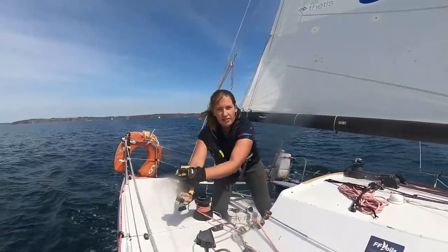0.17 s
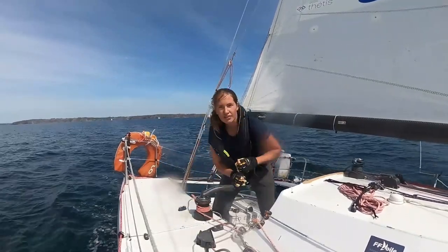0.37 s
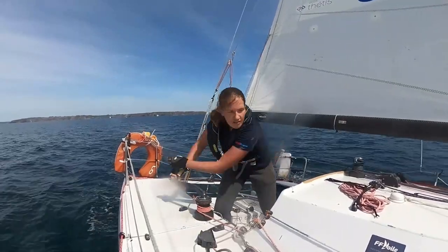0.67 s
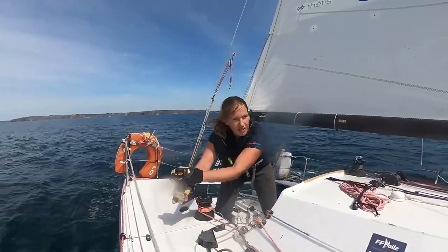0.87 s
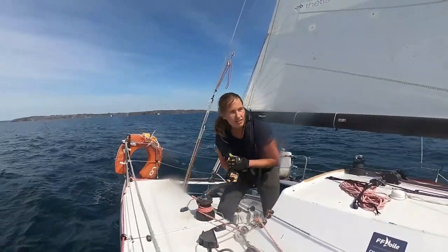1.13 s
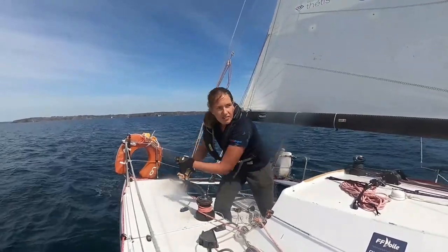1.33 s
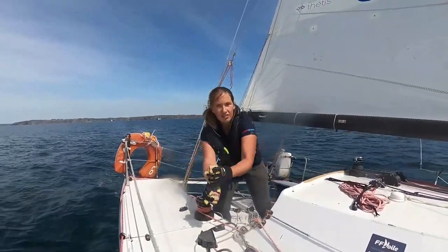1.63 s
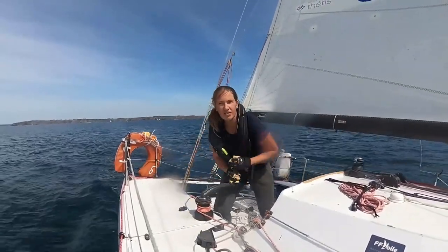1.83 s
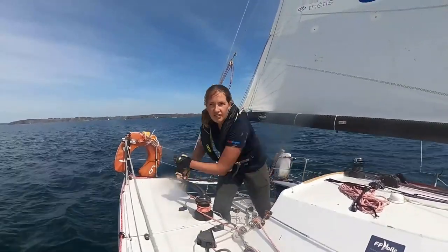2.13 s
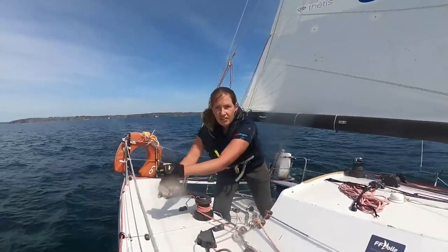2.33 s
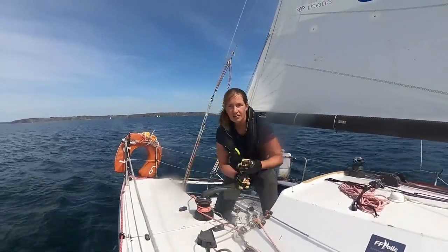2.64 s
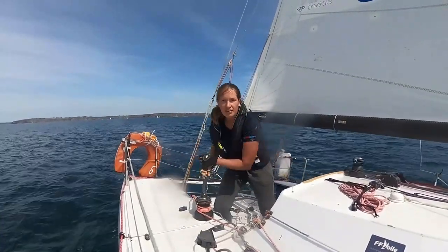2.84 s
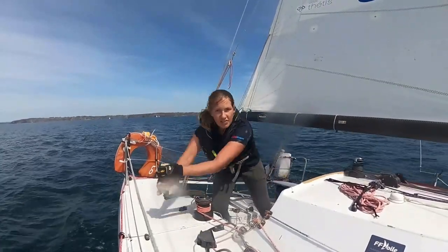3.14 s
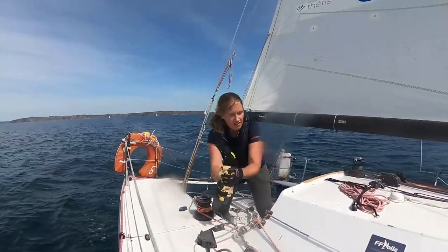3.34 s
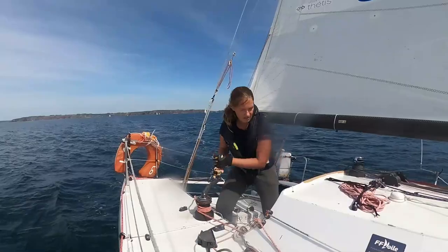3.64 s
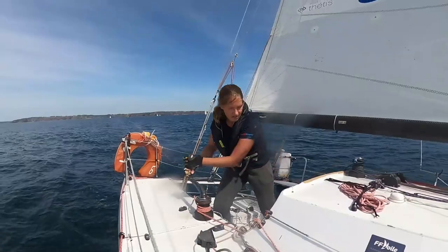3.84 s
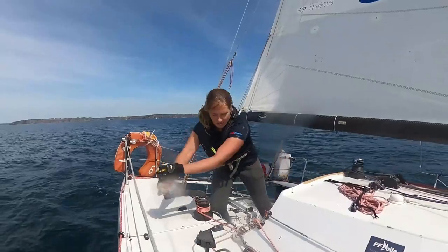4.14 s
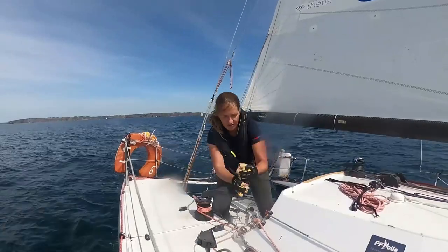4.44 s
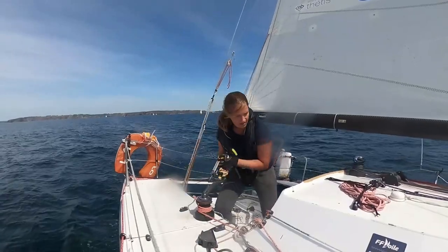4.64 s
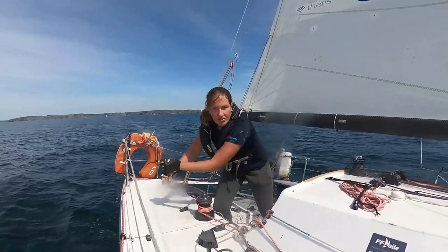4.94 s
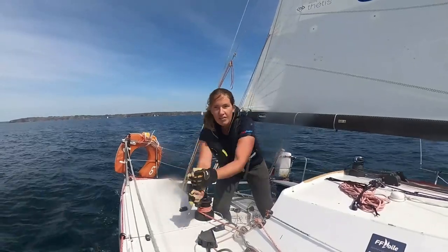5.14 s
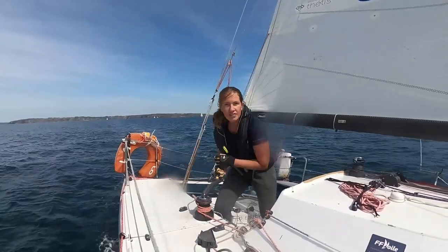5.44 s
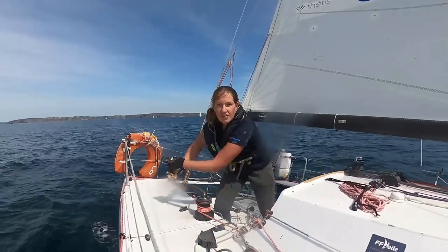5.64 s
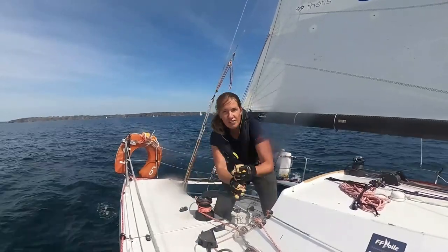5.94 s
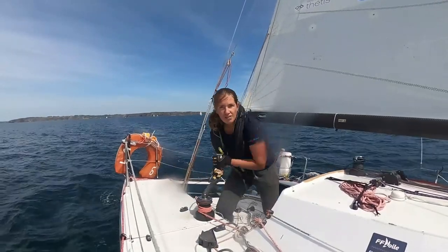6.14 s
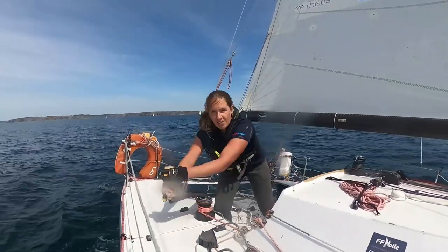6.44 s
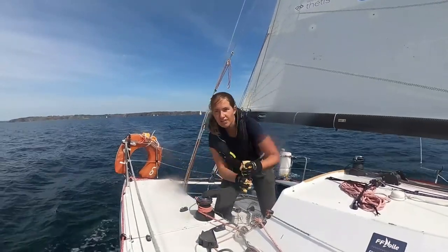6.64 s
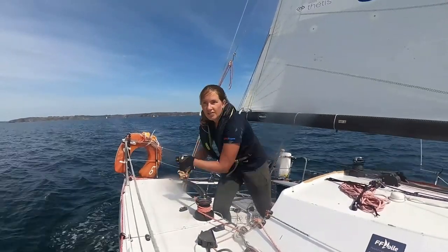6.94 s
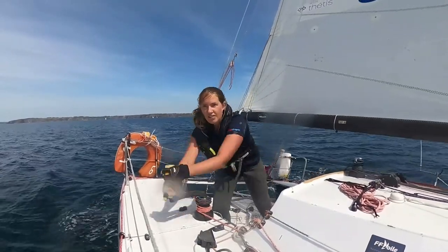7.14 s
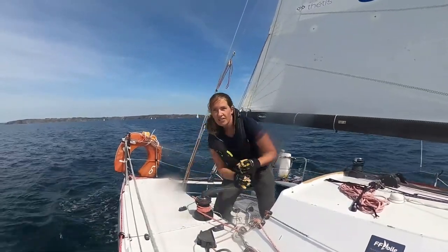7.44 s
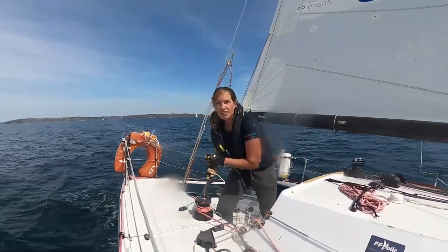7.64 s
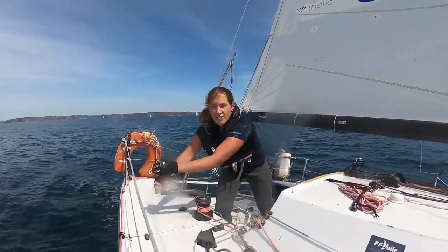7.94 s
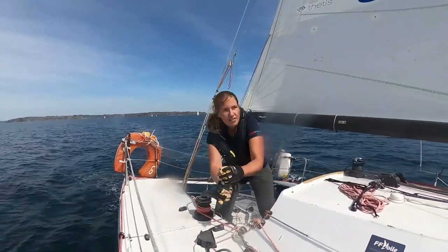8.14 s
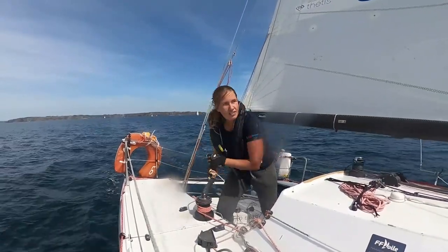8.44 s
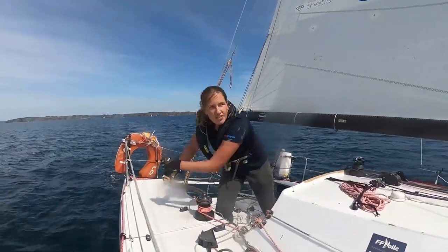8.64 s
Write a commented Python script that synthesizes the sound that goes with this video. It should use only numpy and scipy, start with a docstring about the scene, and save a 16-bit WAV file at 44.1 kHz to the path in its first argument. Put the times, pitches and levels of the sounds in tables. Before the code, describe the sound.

Loaded metal winch clunks ring through a boat deck amid small ratchet ticks, dull knocks, rumbling gusts and sea wash.

```python
"""A sheet winch is cranked by hand on a sailing boat under way, a few steps from a camera fixed to the deck.
The loaded winch lets go in hard clacks: a metal crack, bending waves in the deck that fall in pitch, a hull thump
and a scattered ring. Pawls tick in between, built from short grainy bursts; dull knocks stir the same deck.
Wind buffets the microphone and the sea sloshes and hisses along the hull: coloured noise whose level moves."""
import sys
import numpy as np
from scipy import signal
from scipy.fft import rfft, irfft, next_fast_len
from scipy.io import wavfile
from scipy.ndimage import uniform_filter1d, map_coordinates

SR = 44100
rng = np.random.default_rng(int(sys.argv[2]) if len(sys.argv) > 2 else 0)


def master(y):
    """Save y as 16-bit WAV."""
    cut = np.clip(np.atleast_2d(y).T, -1, 1)
    pcm = np.round(cut * 32767)  # scale
    wavfile.write(sys.argv[1], SR, pcm.astype(np.int16))


N = 388080  # length of the scene [samples]


def amp(db):
    """Turn decibels into a gain."""
    return 10 ** (np.asarray(db) / 20)


def unit(x):
    """Scale x to rms 1."""
    return x / np.sqrt(np.mean(x ** 2) + 1e-20)


def unit_blow(x):
    """Scale a short sound to the energy of 40 ms at rms 1."""
    return x / np.sqrt(np.sum(x ** 2) / (.04 * SR) + 1e-20)


def along(points, hz):
    """Read (frequency [Hz], value) points at any frequency, on a log frequency axis."""
    f, v = np.transpose(points)
    return np.interp(np.log(hz + 1), np.log(f + 1), v)


def curves(rows):
    """Draw straight lines between timed rows: one value per sample for each column after the time."""
    s, *cols = np.transpose(rows)
    return [np.interp(np.arange(N) / SR, s, c) for c in cols]


def wobble(rate):
    """A smooth random curve with rate knots a second."""
    knots = rng.standard_normal(int(N * rate / SR) + 4)
    return map_coordinates(knots, [np.arange(N) * rate / SR])


def coloured(x, spectrum):
    """Filter x to the given (frequency [Hz], gain [dB]) points, with no sound ahead of its cause."""
    size = 4096
    cepstrum = irfft(np.log(amp(along(spectrum, np.fft.rfftfreq(size, 1 / SR)))))
    # folding the cepstrum forward in time makes the filter minimum phase
    cepstrum[1:size // 2] *= 2
    cepstrum[size // 2 + 1:] = 0
    impulse_response = irfft(np.exp(rfft(cepstrum)))
    return signal.fftconvolve(x, impulse_response)[:len(x)]


def rush(spectrum, patchy_db):
    """Steady coloured noise of rms 1, uneven in random patches of time and frequency."""
    z = signal.stft(rng.standard_normal(N), nperseg=512)[2]
    field = uniform_filter1d(rng.standard_normal(z.shape), size=7, axis=0)
    field = uniform_filter1d(field, size=8, axis=1)
    noise = signal.istft(z * amp(patchy_db * unit(field)), nperseg=512)[1][:N]
    gain = amp(along(spectrum, np.fft.rfftfreq(N, 1 / SR)))
    return unit(irfft(rfft(noise) * gain, N))


def burst(spectrum, t60, rise_s, grain_db):
    """A short, grainy cluster of contacts: noise that rises quickly and falls 60 dB in t60 seconds."""
    t = np.arange(SR // 4) / SR
    grains = np.interp(t, np.linspace(0, t[-1], 150), rng.standard_normal(150))
    envelope = amp(grain_db * grains - 60 * t / t60) * (1 - np.exp(-t / rise_s))
    return unit_blow(coloured(rng.standard_normal(len(t)) * envelope, spectrum))


def snap(spectrum):
    """One hard contact: a single coloured impulse."""
    return unit_blow(coloured(signal.unit_impulse(SR // 50), spectrum))


def resonances(modes, hz, vary_db):
    """Frequency response of a set of resonances, each struck a little differently every time."""
    centre, width, db = np.transpose(modes)[:, :, None]
    sign = (-1) ** np.arange(len(modes))[:, None]
    gain = sign * amp(db + vary_db * rng.standard_normal(db.shape))
    damping = 1j * hz * width
    return np.sum(gain * damping / (centre ** 2 - hz ** 2 + damping), axis=0)


def ring_out(response):
    """The sound of a frequency response, faded to silence by a quarter of a second."""
    sound = irfft(response)[:SR // 4]
    return sound * np.minimum(np.linspace(2, 0, len(sound)), 1)


def add(track, s, sound, lead=0):
    """Mix a sound into the track so that its sample number lead falls at time s."""
    start = round(s * SR) - lead
    sound = sound[max(-start, 0):]
    room = track[max(start, 0):][:len(sound)]
    room += sound[:len(room)]


FAINT_SPREAD_DB = 3  # faint ticks and knocks lie within this much of their middle level


def strays(rate, db):
    """(time [s], level [dB]) of faint events, one at a random moment in each 1/rate seconds."""
    chance = rng.random((int(rate * N / SR), 2))
    return [((k + when) / rate, db + FAINT_SPREAD_DB * (2 * size - 1))
            for k, (when, size) in enumerate(chance)]


# water under the hull: (time [s], slosh level before a small lift [dB])
SLOSH_LEVEL = [(0.0, -39), (0.27, -39), (0.46, -45), (1.62, -44), (1.99, -47.5), (3.09, -41.5), (3.8, -47),
               (4.34, -41.5), (5.66, -43), (5.91, -39.5), (6.2, -47), (6.64, -40.5), (6.86, -47.5),
               (8.26, -43), (8.65, -46), (8.8, -38)]
# bubbles in the wake: (time [s], hiss level before a small lift [dB])
HISS_LEVEL = [(0.0, -64.5), (0.17, -56.5), (1.69, -61.5), (1.86, -57), (2.62, -56), (2.79, -63.5),
              (4.0, -56.5), (4.48, -62.5), (4.63, -52.5), (4.78, -53), (6.3, -61.5), (6.84, -63.5),
              (7.21, -60.5), (7.33, -65), (7.89, -61.5), (8.13, -56), (8.63, -62), (8.8, -60.5)]
# a small wave breaks alongside; its foam sinks, swells once more faintly, then dies away:
# (time [s], foam level [dB])
FOAM_LEVEL = [(4.5, -91), (4.64, -52), (4.75, -45.5), (4.87, -53), (5.1, -60), (5.55, -55.5), (5.9, -85)]
# colours of the three water sounds: (frequency [Hz], relative gain [dB])
SLOSH_COLOUR = [(100, -8), (220, 0), (350, 1.5), (600, -4.5), (1000, -10), (1600, -13), (2300, -31),
                (4000, -35), (14000, -100)]
HISS_COLOUR = [(800, -9.5), (2000, 2), (3500, -2.5), (5000, -7), (7000, -14), (8500, -19), (10000, -29.5),
               (13000, -38.5), (16000, -60.5)]
FOAM_COLOUR = [(300, -9.5), (1200, 4.5), (2500, 11), (4500, 4.5), (7000, -5), (9000, -16), (11000, -20),
               (15000, -44)]


def sea():
    """Water sloshes under the hull while bursting bubbles hiss; a breaking wavelet adds foam."""
    (slosh_db,), (hiss_db,), (foam_db,) = curves(SLOSH_LEVEL), curves(HISS_LEVEL), curves(FOAM_LEVEL)
    slosh = amp(slosh_db + 0.2 + 1.3 * wobble(55)) * rush(SLOSH_COLOUR, patchy_db=2.5)
    # about 1500 single bubbles a second over a steady rush
    bubbles = (rng.random(N) < 1500 / SR) * rng.standard_normal(N)
    fizz = rush(HISS_COLOUR, patchy_db=2.0) + amp(-5.5) * unit(coloured(bubbles, HISS_COLOUR))
    hiss = amp(hiss_db + 1.0 + 1.5 * wobble(45)) * fizz
    foam = amp(foam_db + 1.3 * wobble(190)) * rush(FOAM_COLOUR, patchy_db=.6)
    return slosh + hiss + foam


# wind on the microphone between gusts: (time [s], strength [dB])
BREEZE = [(0.0, -22), (0.27, -23.5), (0.51, -28.5), (1.47, -24.5), (1.89, -33), (3.06, -29.5), (3.21, -26),
          (3.82, -30), (4.66, -26.5), (4.78, -29), (5.93, -24), (6.12, -29.5), (7.43, -27.5), (7.62, -32),
          (7.87, -31.5), (8.13, -25), (8.53, -27), (8.8, -26.5)]
# single gusts that hit the microphone: (time [s], buffet level [dB], flutter level [dB])
GUST_HITS = [(1.02, -30, -22), (1.31, -17.5, -27), (1.47, -19, -23.5), (1.68, -20.5, -25), (3.4, -27, -25),
             (4.28, -26, -25), (4.66, -22, -22.5), (5.8, -18.5, -23), (6.79, -19, -18.5), (7.17, -22, -21),
             (7.39, -22, -28), (8.21, -21, -24), (8.79, -18.5, -21.5)]
# colours of the big and the small eddies: (frequency [Hz], relative gain [dB])
BUFFET_COLOUR = [(8, -7), (25, 0), (45, -4.5), (70, -2.5), (100, -14.5), (200, -36.5), (500, -91.5),
                 (2000, -120)]
FLUTTER_COLOUR = [(40, -17.5), (80, -1), (120, 1.5), (160, -6.5), (220, -11), (320, -29), (600, -38),
                  (4000, -120)]
BUFFET_DB, FLUTTER_DB = 1, -3.5  # big and small eddies, relative to the breeze's strength
GUST_WIDTH_S = 0.026  # standard deviation of a gust's bell-shaped swell


def wind():
    """Big eddies push on the microphone and smaller ones flutter across it; both follow the breeze and gusts."""
    strength_db, = curves(BREEZE)
    breeze = amp(strength_db)
    t = np.arange(N) / SR
    push, shake = np.zeros(N), np.zeros(N)
    for s, big_db, small_db in GUST_HITS:
        swell = np.exp(-.5 * ((t - s) / GUST_WIDTH_S) ** 2)
        push += amp(big_db) * swell
        shake += amp(small_db) * swell
    # breeze and gust add as powers
    buffet_level = np.hypot(amp(BUFFET_DB + 1.3 * wobble(14)) * breeze, push)
    flutter_level = np.hypot(amp(FLUTTER_DB + 3.44 * wobble(30)) * breeze, shake)
    buffet = buffet_level * rush(BUFFET_COLOUR, patchy_db=0.24)
    flutter = flutter_level * rush(FLUTTER_COLOUR, patchy_db=0.84)
    return buffet + flutter


# resonances of the deck under the winch: (frequency [Hz], width [Hz], typical level [dB])
DECK_MODES = [(312.7, 26, -7.5), (338.6, 13.4, -1), (367.6, 60.0, -10), (463, 13, -4.5), (483.5, 19, -0.5),
              (598, 56, -9), (667.3, 24, -3.5), (719.4, 30.6, -3.5), (801, 64, 0), (808, 31, -3.5),
              (952, 9.0, -14), (1026, 12, -8.0), (1093, 89, -8.5), (1151, 83, -10.5), (1265, 20, -12),
              (1400, 9.5, -21.5), (1541, 127, -18.5), (1736, 126, -12), (1764, 24, -15), (1930, 90, -18.5),
              (2030, 61, -24), (2170, 120, -24)]


def deck_wave(bright_db, travel_s, front_hz, chatter, direct):
    """One blow heard through the deck: bending waves travel as the root of frequency, so the highs come first."""
    hz = np.fft.rfftfreq(SR // 2, 1 / SR)
    # travel_s is the trip at 1 kHz; delays count from the arrival of front_hz
    slowness = np.sqrt(1000 / np.maximum(hz, 1))
    delay = travel_s * np.maximum(slowness - np.sqrt(1000 / front_hz), 0)
    # a smaller share comes straight through, ahead of the bending wave
    paths = direct + np.exp(-2j * np.pi * np.cumsum(delay) * hz[1])
    # the metal chatters as it seats: five weaker contacts follow the first, typically within milliseconds
    later = rng.exponential(0.00402, size=(5, 1))
    strength = chatter * rng.standard_normal(size=(5, 1)) * np.exp(-later / 0.0091)
    contacts = 1 + np.sum(strength * np.exp(-2j * np.pi * hz * later), axis=0)
    hardness = [(900, 0), (1600, bright_db), (2100, bright_db), (3000, -11.0), (6000, -37), (14000, -91.5)]
    ring = ring_out(resonances(DECK_MODES, hz, vary_db=2.0) * paths * contacts)
    return unit_blow(coloured(ring, hardness))


# low resonances of the hull: (frequency [Hz], width [Hz], typical level [dB])
HULL_MODES = [(112.4, 11.0, 0.5), (148, 19, 2), (184.4, 19, -3), (212, 18, -3), (257.6, 29, -8)]


def hull_thump():
    """The hull's low answer to one blow: its resonances ring, with the treble softened."""
    hz = np.fft.rfftfreq(SR // 2, 1 / SR)
    softness = [(300, -18), (1000, -7.0), (3000, -35.0), (10000, -90)]
    return unit_blow(coloured(ring_out(resonances(HULL_MODES, hz, vary_db=1.5)), softness))


# colour of the sound scattered around the boat after a clack: (frequency [Hz], relative gain [dB])
SCATTER_COLOUR = [(90, -9), (200, -4.5), (400, 8.5), (800, 3.5), (1400, -4.5), (1800, -8.5), (2500, -16),
                  (4000, -26), (7000, -38.5), (9500, -52.5), (11500, -47), (13000, -58), (15000, -54.5)]
# how long the scattered sound takes to fall 60 dB: (frequency [Hz], t60 [s])
SCATTER_T60 = [(200, 0.38), (700, 0.21), (1800, 0.18), (5000, 0.16), (12000, .17)]


def scatter(build_s):
    """Diffuse ring of the boat: it builds up briefly, then each frequency dies at its own speed."""
    hz, t, z = signal.stft(rng.standard_normal(SR // 3), SR, nperseg=256)
    decay = amp(-60 * t / along(SCATTER_T60, hz)[:, None])
    tail = signal.istft(z * decay, SR, nperseg=256)[1]
    build_up = 1 - np.exp(-np.arange(len(tail)) / SR / build_s)
    return unit_blow(coloured(tail * build_up, SCATTER_COLOUR))


# clacks of the loaded winch, each level shared by the parts below at their own offsets:
# (time [s], level [dB], extra hull thump [dB], extra brightness [dB])
WINCH_CLACKS = [(0.062, -25, 5.5, -0.5), (0.145, -22.5, 3.5, 0.5), (0.2549, -21, 2, -1.5),
                (0.3686, -22, 5.5, 1.5), (0.7826, -21, -1, 2), (0.9495, -20, -1, -0.5),
                (1.411, -20.5, -6.5, -1.5), (1.6376, -21, 1.5, -0.5), (1.8944, -21.5, 4, 2.5),
                (2.2649, -19.5, -0.5, -0.5), (2.7147, -18.5, 5.5, -1.5), (3.0395, -19.5, 6, -0.5),
                (3.1707, -19.3, -2, -0.5), (4.0593, -20.3, -1.5, 0), (4.1784, -19.2, -5, 0.5),
                (4.478, -19, 4.5, 1), (5.1495, -21.4, 6.5, 1), (5.3292, -20, 5.5, -0.5),
                (5.6989, -20, 5, -0.5), (5.829, -20.3, 3.5, 0), (6.0384, -19.5, 4, -1.5),
                (6.3761, -20, -1, -2.5), (6.5544, -19.5, 0, -1.5), (7.0688, -19.5, -2.5, -0.5),
                (7.1981, -20, -0.5, -0.5), (7.5132, -20.5, 6, 1), (7.957, -19, -1, 0.5),
                (8.3335, -21.7, 7, -2.5), (8.6382, -19.5, 2, 0)]
# the line creeping on the drum just before a clack: (frequency [Hz], relative gain [dB])
CREEP_COLOUR = [(200, -12.5), (600, 6), (1100, 1.5), (1800, -0.5), (2500, -9.5), (4000, -20.5), (7000, -35),
                (10000, -44), (15000, -64)]
# the metal contact itself: (frequency [Hz], relative gain [dB])
CRACK_COLOUR = [(900, -31.5), (2000, 13), (2600, -1), (3600, -0.5), (5000, -15), (7000, -20.5),
                (9500, -42.5), (11500, -50.5), (15000, -65.5)]
# the metal seats equally hard at every clack: the grainy crack, and one hard snap just after it begins
CRACK_DB, SNAP_DB = -42, -51
BOOM_DB, BOOM_T60_S = -6.5, .22  # low boom of the hull, relative to the clack's level


def winch():
    """The load creeps, then lets go: a metal crack, a falling wave in the deck, a hull thump and a diffuse ring."""
    out = np.zeros(N)
    for s, db, thump_db, bright_db in WINCH_CLACKS:
        # a burst played backwards swells up to the release
        creep = burst(CREEP_COLOUR, t60=0.051, rise_s=0.00064, grain_db=2.0)[::-1]
        wave = deck_wave(bright_db, travel_s=.012, front_hz=2100, chatter=.17, direct=0.32)
        # the boom shares the low colour of the wind's flutter
        boom = burst(FLUTTER_COLOUR, t60=BOOM_T60_S, rise_s=0.006, grain_db=1.0)
        crack = burst(CRACK_COLOUR, t60=0.037, rise_s=0.001, grain_db=1.0)
        add(out, s + .001, amp(db - 20) * creep, lead=len(creep))
        add(out, s, amp(db - 0.5) * wave)
        add(out, s, amp(db + thump_db - 6) * hull_thump())
        add(out, s, amp(db + BOOM_DB) * boom)
        add(out, s - .0005, amp(CRACK_DB) * crack)
        add(out, s + 0.00092, amp(SNAP_DB) * snap(CRACK_COLOUR))
        add(out, s, amp(db - 4.0) * scatter(build_s=0.0028))
    return out


# colour of a tick, also used for the pawls below: (frequency [Hz], relative gain [dB])
TICK_SPECTRUM = [(800, -32), (1800, 4.5), (3300, 3.5), (5500, -4.5), (7500, -15.5), (10000, -29),
                 (15000, -51.5)]


def gear_clicks(rate, db, spread_db):
    """Tiny stray clicks from the turning gear, rate a second on average, a few louder than the rest."""
    out, click = np.zeros(N), snap(TICK_SPECTRUM)
    for when, size in rng.random((round(rate * N / SR), 2)):
        add(out, when * N / SR, amp(db + spread_db * size ** 2) * click)
    return out


# the clearest ticks of the pawls and handle, with a few short rope scuffs among them:
# (time [s], level before the offsets below [dB], extra treble [dB per octave], longer burst's t60 [s])
CLEAR_TICKS = [(0.3326, -36.5, -2, .08), (0.451, -38, -2, .04), (0.625, -35, 1, .1), (0.872, -40, -3, .08),
               (1.566, -42, -4, 0.046), (1.713, -39.5, -1, .19), (2.6047, -32.5, -5, 0.078),
               (2.6516, -39.5, 1, .1), (2.7896, -40, 0, .05), (2.9303, -34.5, -4, .08),
               (3.2344, -34, -3.5, .1), (3.352, -38, 0, .1), (3.541, -31.5, -3, 0.1),
               (3.709, -33, 0, 0.098), (4.0092, -38, -6, .07), (4.4578, -39.5, 3, .09),
               (4.8648, -38, 2.5, 0.045), (6.132, -40, 1, .09), (6.4494, -36.5, -7, .06),
               (6.6994, -31.5, -1, .15), (6.8473, -36, 0.5, 0.076), (6.979, -35.5, -10, .055),
               (7.0329, -40, 0, 0.042), (7.319, -33, -4, .07), (7.3567, -44.5, 5, .08),
               (7.572, -33, -4, .19), (7.905, -27.5, -7.5, .15), (8.4103, -36.5, 3.5, .14),
               (8.52, -34.5, -7.5, .055)]
# faint ticks; their level takes the same offsets
FAINT_TICKS_PER_S, FAINT_TICK_DB, FAINT_TICK_T60_S = 1.5, -49, .04


def pawls():
    """Light, dry ticks, each a short burst of contacts over a longer, slower-rising burst of grainy noise."""
    out = np.zeros(N)
    faint = [(s, db, 0, FAINT_TICK_T60_S) for s, db in strays(FAINT_TICKS_PER_S, FAINT_TICK_DB)]
    for s, db, treble_db, t60 in list(CLEAR_TICKS) + faint:
        # the treble tilt pivots at 4 kHz
        colour = [(hz, level + treble_db * np.log2(hz / 4000)) for hz, level in TICK_SPECTRUM]
        short_burst = burst(colour, t60=0.012, rise_s=.0007, grain_db=1.0)
        long_burst = burst(colour, t60, rise_s=0.0086, grain_db=3.5)
        add(out, s - .0005, amp(db - 19) * short_burst)
        add(out, s - .004, amp(db - 17) * long_burst)
    return out


# the heaviest dull knocks of gear and water against the boat: (time [s], level before the offsets below [dB])
HEAVY_KNOCKS = [(0.756, -30), (1.07, -32.5), (1.135, -29.5), (1.227, -34), (1.362, -31.5), (1.53, -34),
                (1.602, -28), (1.765, -30.5), (1.832, -32.5), (2.209, -32.5), (2.504, -35), (2.616, -29.5),
                (3.239, -30.5), (3.522, -34.5), (3.607, -32.5), (3.866, -30.5), (4.637, -32), (5.069, -27),
                (5.304, -34), (5.443, -33.5), (5.517, -32), (6.302, -35), (6.527, -26.5), (6.797, -28),
                (7.492, -34), (7.698, -33)]
# colour of a knock: (frequency [Hz], relative gain [dB])
KNOCK_COLOUR = [(60, -6), (150, 11), (350, 3.5), (700, 1), (1500, -18.5), (2500, -28), (6000, -53)]
FAINT_KNOCKS_PER_S, FAINT_KNOCK_DB = 2, -40  # the level takes the same offsets


def bumps():
    """Soft, dull blows that stir the same deck as the winch does."""
    out = np.zeros(N)
    for s, db in list(HEAVY_KNOCKS) + strays(FAINT_KNOCKS_PER_S, FAINT_KNOCK_DB):
        thud = burst(KNOCK_COLOUR, t60=0.091, rise_s=0.0014, grain_db=2.5)
        wave = deck_wave(bright_db=-2.0, travel_s=.008, front_hz=2070, chatter=0.48, direct=0.44)
        add(out, s - .002, amp(db - 11.5) * thud)
        add(out, s - .002, amp(db - 14.0) * wave)
    return out


def scene():
    """Water, wind, winch and knocks added up at one microphone."""
    weather = sea() + wind()
    gear = winch() + gear_clicks(rate=11, db=-70.5, spread_db=8) + pawls()
    return (weather + gear + bumps())[None]


TOP_HZ = 15600  # band limit of the camera


def record(dry):
    """The camera keeps nothing above its band limit: every higher frequency is set to zero."""
    size = next_fast_len(N + SR // 2)
    kept = np.fft.rfftfreq(size, 1 / SR) < TOP_HZ
    return irfft(rfft(dry, size) * kept, size)[:, :N]


dry = scene()
out = record(dry)
master(out)
```